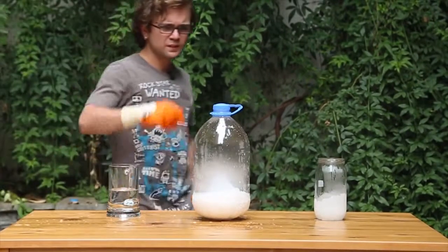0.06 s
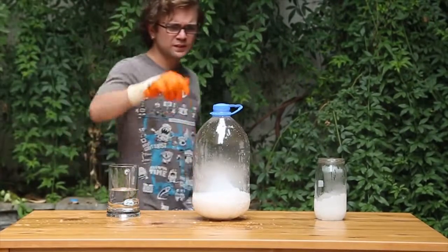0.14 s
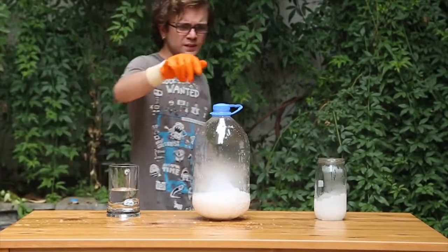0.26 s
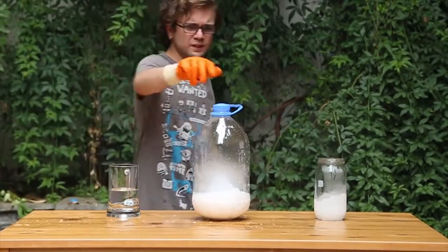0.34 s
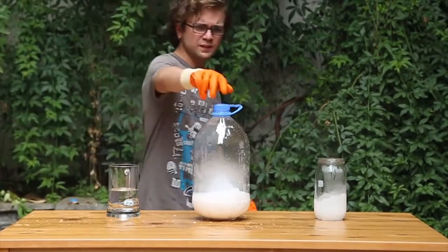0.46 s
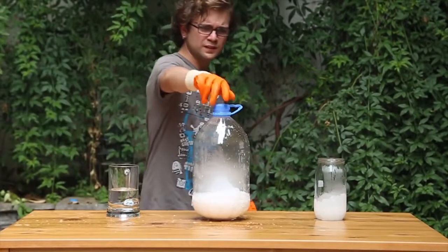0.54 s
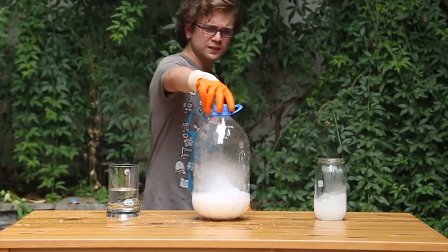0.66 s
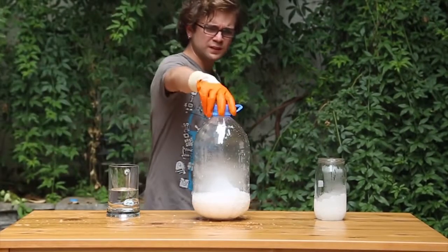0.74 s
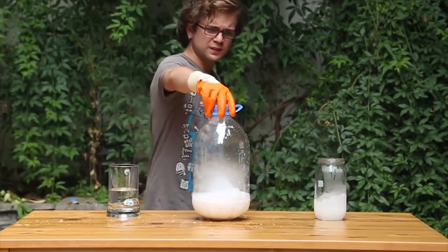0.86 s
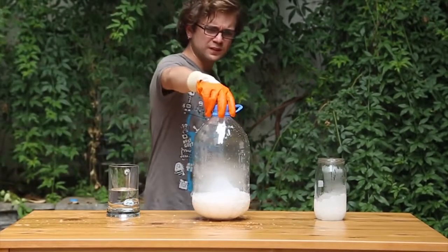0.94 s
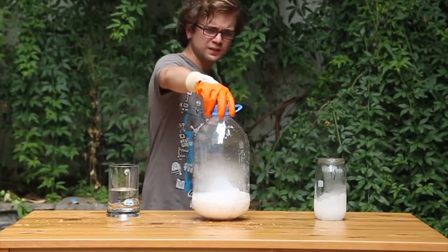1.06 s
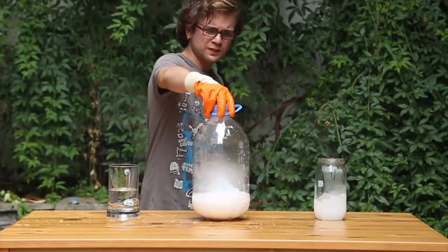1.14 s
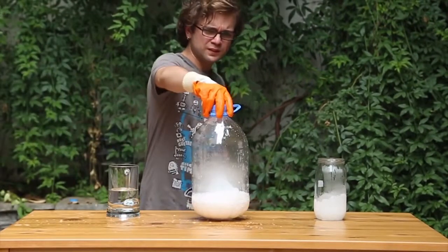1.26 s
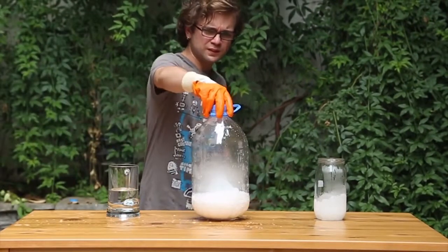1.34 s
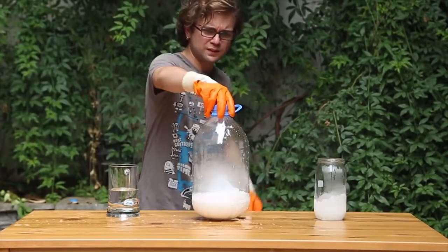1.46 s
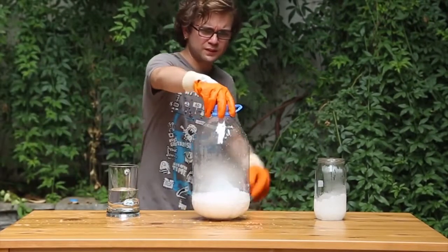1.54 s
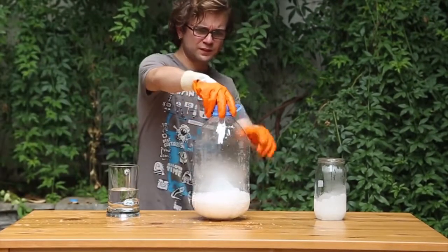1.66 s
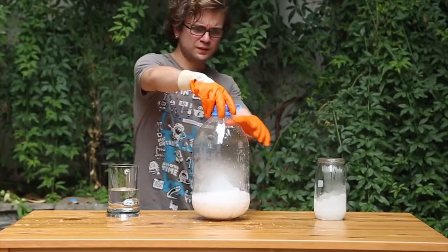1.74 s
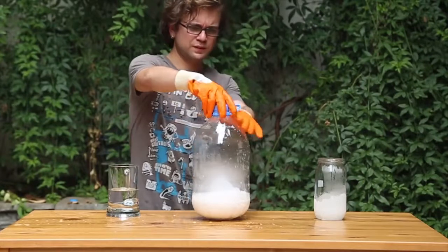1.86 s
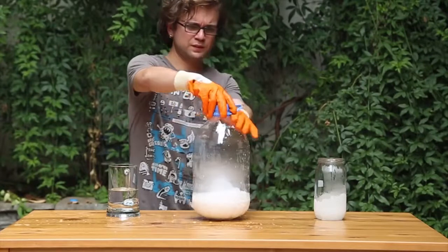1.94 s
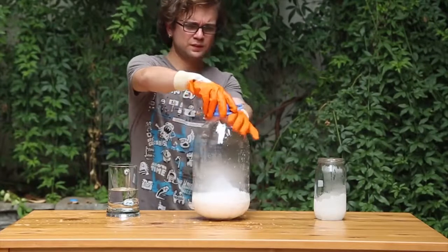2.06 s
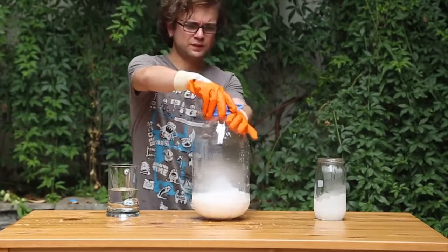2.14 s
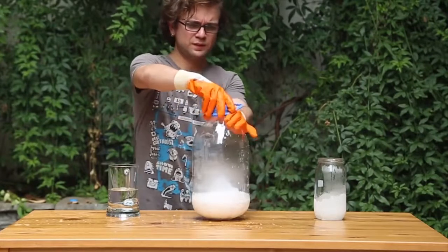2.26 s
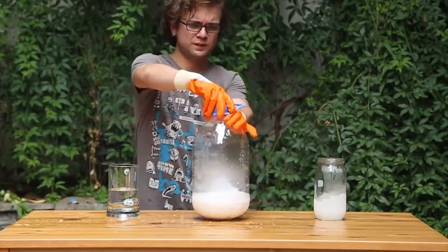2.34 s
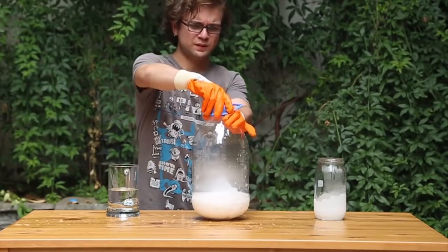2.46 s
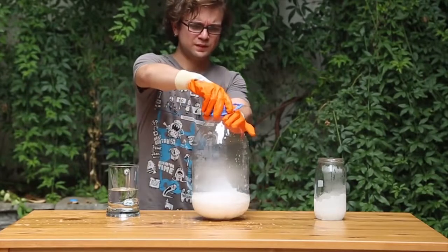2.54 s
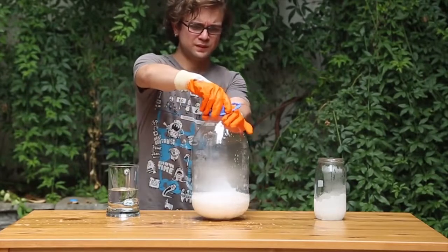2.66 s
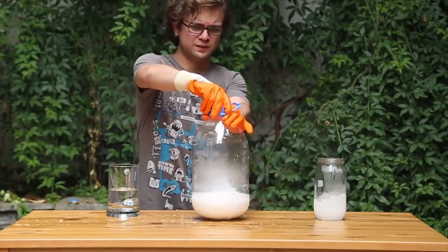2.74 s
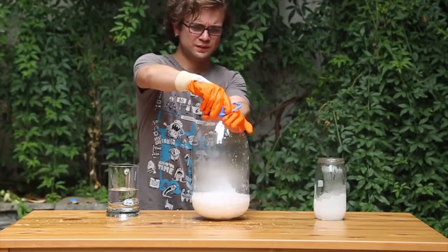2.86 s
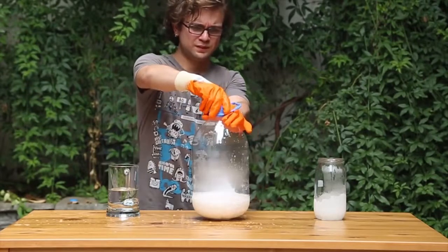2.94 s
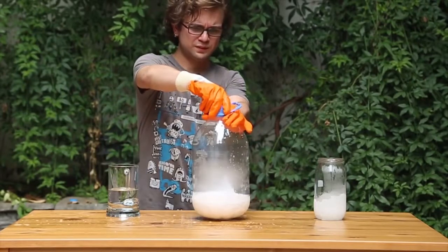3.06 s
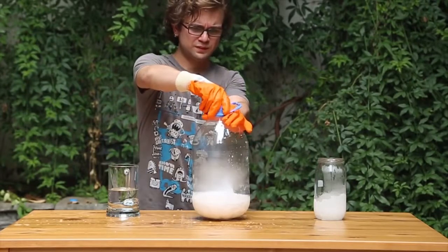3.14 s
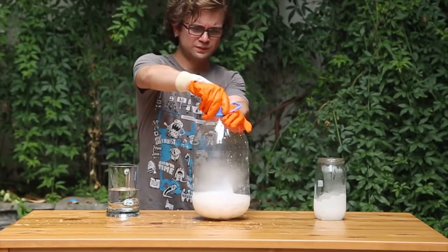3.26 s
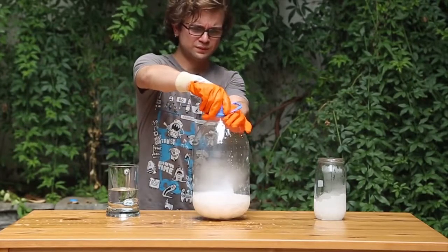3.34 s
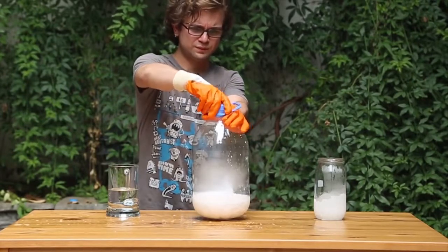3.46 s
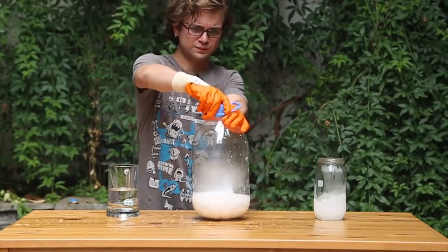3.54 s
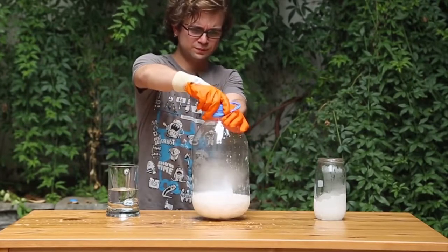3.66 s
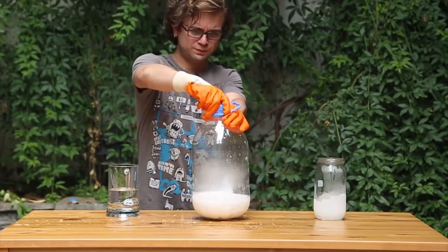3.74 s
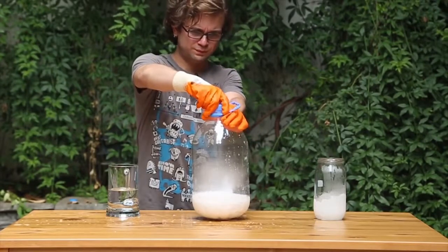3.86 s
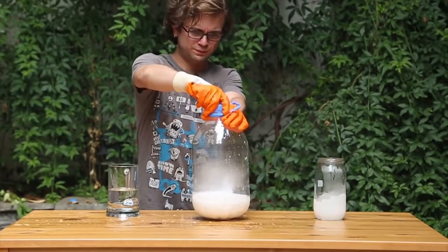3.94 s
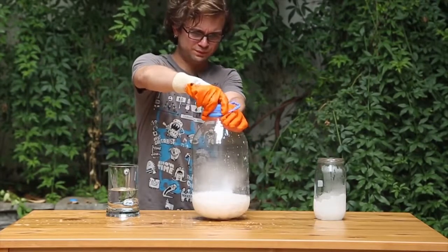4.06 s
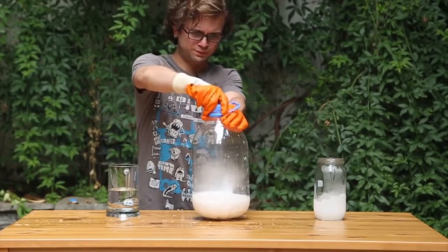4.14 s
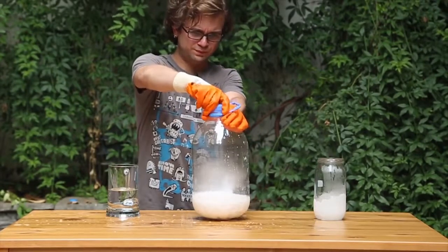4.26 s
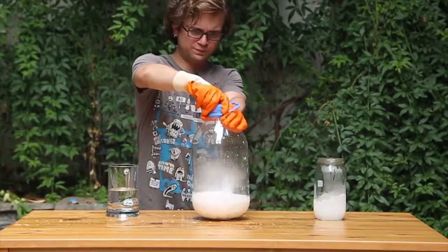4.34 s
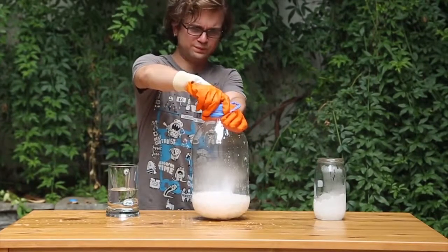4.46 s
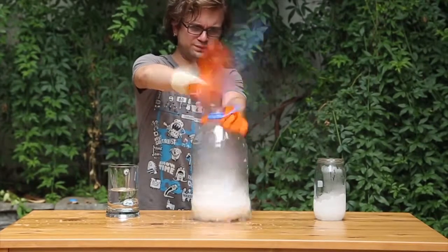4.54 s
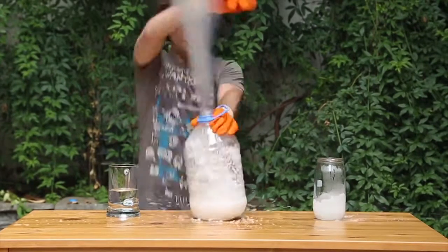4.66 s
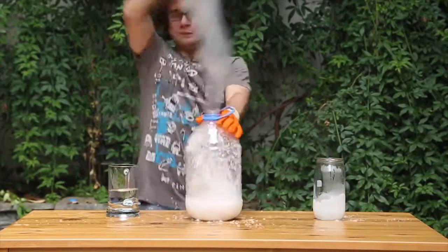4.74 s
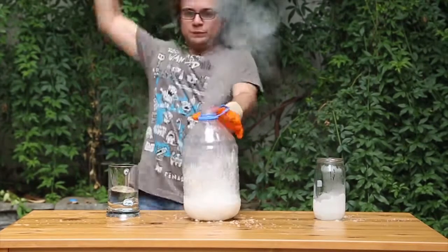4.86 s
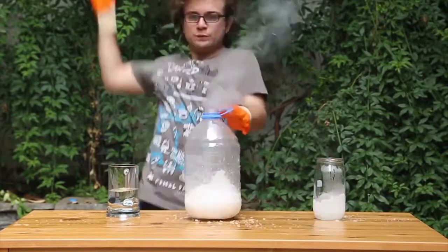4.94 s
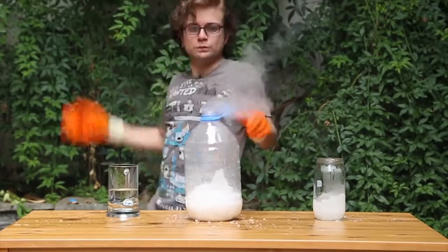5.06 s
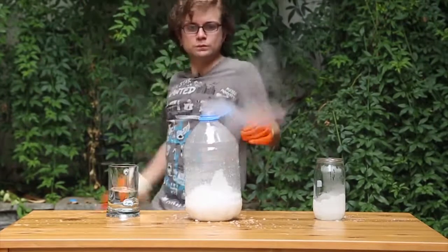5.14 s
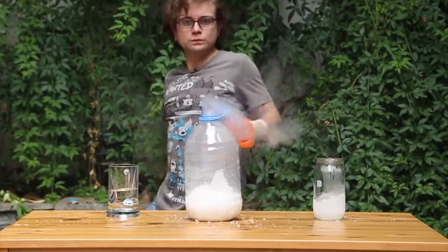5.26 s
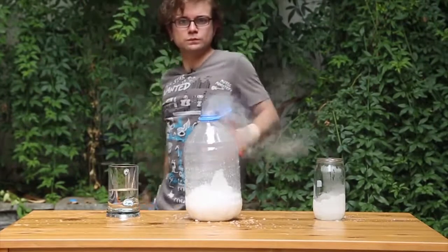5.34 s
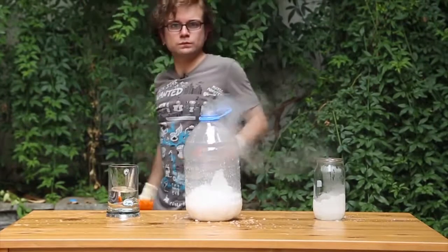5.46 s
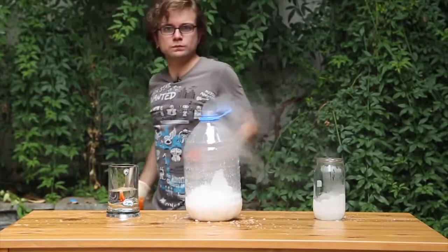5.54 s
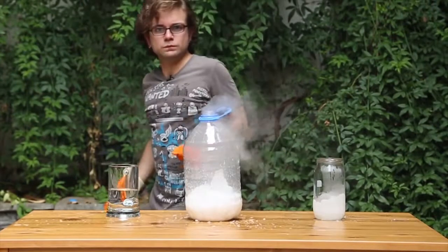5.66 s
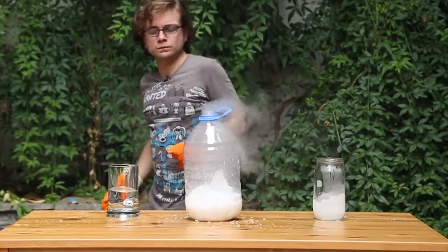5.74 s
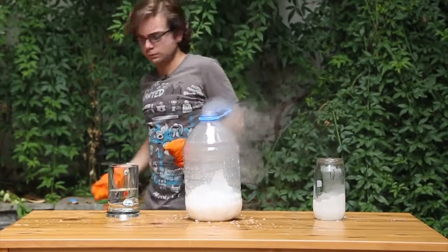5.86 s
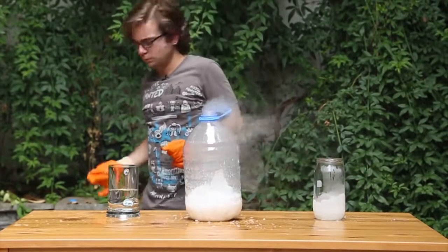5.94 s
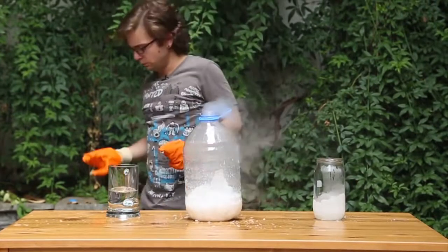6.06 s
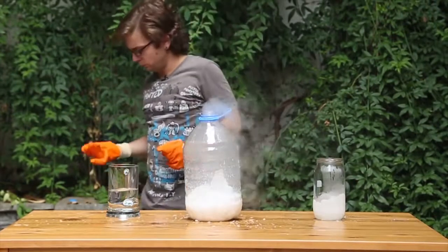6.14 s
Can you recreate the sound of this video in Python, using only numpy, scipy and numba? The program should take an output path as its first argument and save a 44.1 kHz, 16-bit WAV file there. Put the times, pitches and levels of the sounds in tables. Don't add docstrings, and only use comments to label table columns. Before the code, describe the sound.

Outdoors in a walled garden, over a faint town rumble, gas leaks past a plastic jug's cap with a high, wavering hiss. Fizz and gurgle grow inside, plastic ticks, gloves rub, sparrows chirp far off. A short jet rips out, the cap pops with a deafening, distorted bang, and echoes roll away in about a second. Ice crumbs patter and shoes scrape grit. One microphone a few metres off.

```python
import sys
import numpy as np
from scipy import signal
from scipy.io import wavfile
from scipy.ndimage import map_coordinates
from numba import njit

SR = 44100
rng = np.random.default_rng(int(sys.argv[2]) if len(sys.argv) > 2 else 0)


def master_out(mix):
    frames = np.transpose(np.atleast_2d(mix))
    ceiling = np.clip(frames, -1, 1)
    pcm = np.round(ceiling * 32767).astype(np.int16)
    wavfile.write(sys.argv[1], SR, pcm)


def level_to_linear(level):
    exponent = np.asarray(level, float) / 20
    return 10 ** exponent


N = 273678
POP_S = 4.6662


def rms_one(x):
    return x / np.sqrt(np.mean(x ** 2) + 1e-20)


def at_hz(points, hz):
    points = np.array(points)
    return np.interp(np.log(hz), np.log(points[:, 0]), points[:, 1])


def in_time(rows):
    s, *columns = np.transpose(rows)
    return [np.interp(np.arange(N) / SR, s, c) for c in columns]


def drift(rate):
    r = np.exp(-80 * np.pi * rate / SR)
    white = rng.standard_normal(N // 40 + 2002)
    slow = signal.lfilter([1], [1, -2 * r, r * r], white)[2000:]
    return np.interp(np.arange(N) / 40, np.arange(len(slow)), rms_one(slow))


@njit
def sweep(x, hz, width_hz, rate):
    out, r = np.zeros(len(x)), np.exp(-np.pi * width_hz / rate)
    for i in range(2, len(x)):
        drive = (1 - r * r) / 2 * (x[i] - x[i - 2])
        out[i] = drive + 2 * r * np.cos(2 * np.pi * hz[i] / rate) * out[i - 1] - r * r * out[i - 2]
    return out


def resonance(x, hz, width_hz):
    r = np.exp(-np.pi * width_hz / SR)
    poles = [1, -2 * r * np.cos(2 * np.pi * hz / SR), r * r]
    return signal.lfilter([(1 - r * r) / 2, 0, (r * r - 1) / 2], poles, x)


def bands(spectrum):
    edges = 22 * 2 ** np.arange(0, 9.9, .5)
    white = rng.standard_normal((2, N))
    hz = np.sqrt(edges[1:] * edges[:-1])
    rows = []
    for k in range(len(hz)):
        band = signal.butter(2, edges[k:k + 2], "band", fs=SR, output="sos")
        rows.append(signal.sosfilt(band, white[k % 2]))
    rows = np.array(rows) * level_to_linear(at_hz(spectrum, hz))[:, None]
    return hz, rows / np.std(rows.sum(axis=0))


def add(out, s, sound):
    i = round(s * SR)
    out[i:i + len(sound)] += sound[:N - i]


# [f/Hz, level/dB]
TOWN_COLOUR = [(15, -34), (25, -4), (64, -0.5), (253, -3.5), (323, -3.5), (497, -7), (650, -5),
               (1110, -14.5), (1210, -8.5), (1420, -11.5), (3840, -17.5), (9860, -30), (15600, -33.5)]
# [f/Hz, width/Hz, level/dB]
HUMS = [
    (57.5, 5, -67.5),
    (140, 8.8, -72),
]
TOWN_DB = -58.5


def town():
    hz, rows = bands(TOWN_COLOUR)
    out = level_to_linear(TOWN_DB + 1.5) * sum(row * level_to_linear(1.3 * drift(5)) for row in rows)
    for hum_hz, width, db in HUMS:
        once = resonance(rng.standard_normal(N), hum_hz, width)
        out = out + level_to_linear(db) * rms_one(resonance(once, hum_hz, width))
    return out


# [t/s, level/dB, gap opening/octaves that the jet's pitch sinks]
FLOW = [(0, -50.5, 0.2), (.7, -45.5, 0.067), (1.1, -45, 0.053), (1.5, -49, 0.5), (1.75, -46.5, 0.056),
        (2.1, -45, 0.27), (2.45, -47, 0.19), (2.85, -49, 0.44), (3.2, -42.5, 0.47), (3.5, -46, 0.59),
        (3.57, -42, 0.5), (3.68, -47.5, 0.8), (3.85, -40.5, 0.82), (4.35, -39, 0.87), (4.58, -46, 0.87),
        (4.62, -39.5, 0.86)]
# [f/Hz, width/Hz, level/dB, share of the flow's swing]
THREAD = [
    (7996, 1500, -0.5, 1),
    (11040, 4200, 0.5, 0.92),
    (14100, 3200, 0.0, 0.81),
]
# [f/Hz, width/Hz, level open/dB, gain while covered/dB]
PALM = (6101.5, 2235.5, -60, 8)
PALM_ON_S, PALM_OFF_S, PALM_MOVE_S = 0.76, 1.96, .06
TIGHT_JET_HZ, OFF_PITCH_DB_PER_OCT2, OFF_PITCH_FLOOR_DB = 15600, -31.5, -8


def thread_whistles():
    flow_db, opening = in_time(FLOW)
    t = np.arange(N) / SR
    covered = np.clip(np.minimum(t - PALM_ON_S, (PALM_OFF_S - t) / 3) / PALM_MOVE_S, 0, 1)
    levels = []
    for hz, _, db, follows in THREAD:
        off_pitch = np.log2(TIGHT_JET_HZ / hz) - opening
        off_pitch_db = np.maximum(OFF_PITCH_FLOOR_DB, OFF_PITCH_DB_PER_OCT2 * off_pitch ** 2)
        levels.append(-46 + db + follows * (flow_db + 46) + off_pitch_db)
    levels.append(PALM[2] + PALM[3] * covered)
    out = 0
    for (hz, width, *_), db in zip(THREAD + [PALM], levels):
        once = resonance(rng.standard_normal(N), hz, width)
        out = out + level_to_linear(db + 1.3 * drift(8.6)) * rms_one(resonance(once, hz, width))
    return out


# [t/s, dip f/Hz, spacing of neighbouring dips/Hz, depth 0-1]
HAND = [(0, 11460, 3480, 0.5), (.15, 10480, 3560, .75), (.4, 10860, 3300, .7), (.5, 12500, 2500, 0.01),
        (1.45, 13980, 2984, .2), (1.62, 12200, 3300, .7), (1.85, 9980, 2750, 0.8), (2.05, 8100, 2500, 0.7),
        (2.5, 8700, 1900, 0.8), (2.95, 8800, 3400, 1), (3.55, 9450, 3430, 0.7), (3.9, 10070, 3400, 0.7),
        (4.25, 10260, 3500, 1), (4.62, 10100, 3500, 0.8)]
CUP_SHUTS_AT, CUP_SHUTS_OVER = 0.42, 0.27
UPPER_DIP_SHARE, TREMBLE, DIP_FLICKER, CUP_LIFT = .85, .008, .2, 0.44
NECK_DIP_HZ, NECK_DIP_DEPTH = 9000, 0.59
CHEST_ECHO_MS = 1.2


def leak():
    out, opening = thread_whistles(), in_time(FLOW)[1]
    t = np.arange(N) / SR
    dip_hz, spacing_hz, depth = in_time(HAND)
    neck_depth = NECK_DIP_DEPTH * np.clip((PALM_OFF_S - t) / 0.66, 0, 1)
    dips = [(dip_hz - spacing_hz, (opening - CUP_SHUTS_AT) / CUP_SHUTS_OVER),
            (dip_hz, depth),
            (dip_hz + spacing_hz, UPPER_DIP_SHARE * depth),
            (NECK_DIP_HZ + 0 * t, neck_depth)]
    for hz, deep in dips:
        shaky_hz = hz * (1 + TREMBLE * drift(5))
        cut = np.clip(deep * (1 + DIP_FLICKER * drift(3)), 0, .9)
        out = out - cut * sweep(out, shaky_hz, 1150.0, SR)
    peak_hz = np.minimum(dip_hz + spacing_hz / 2, 15500)
    out = out + CUP_LIFT * depth * sweep(out, peak_hz, 1400.0, SR)
    lag = CHEST_ECHO_MS * (1 + .1 * drift(.6)) * SR / 1000
    for share, further in [(0.18, 1), (.2, 1.7)]:
        out = out + share * map_coordinates(out, [np.arange(N) - further * lag], order=3)
    return out * (t < POP_S)


def bubbles(per_s, clump_db, modes):
    sizes = level_to_linear(3 * np.minimum(rng.exponential(1, N), 3)) * rng.choice([-1, 1], N)
    grains = sizes * (rng.random(N) < per_s * level_to_linear(clump_db * drift(25)) / SR)
    out = 0
    for k, (hz, width, db) in enumerate(modes):
        out = out + level_to_linear(db) * resonance(grains, hz, width) * (-1) ** k
    return rms_one(out)


# [t/s, level/dB]
BOIL = [
    (0, -76.5),
    (.85, -80),
    (1.65, -71),
    (1.85, -67),
    (2.3, -66.5),
    (2.75, -64),
    (3.3, -61),
    (3.8, -61),
    (4.15, -62),
    (4.62, -65.5),
]
# [f/Hz, width/Hz, level/dB]
GURGLE = [
    (844, 210, 2.5),
    (1300, 260, 0.5),
]
# [f/Hz, width/Hz, level/dB]
FIZZ = [
    (1900, 130, 2),
    (2900, 550, 0.5),
    (3800, 2000, -3),
]
FIZZ_OVER_GURGLE_DB, FIZZ_FOLLOWS = 6, .9


def boil():
    vigour_db, = in_time(BOIL)
    fizz_db = -64 + FIZZ_OVER_GURGLE_DB + FIZZ_FOLLOWS * (vigour_db + 66)
    gurgle = level_to_linear(vigour_db + 4.0) * bubbles(2500, 2.4, GURGLE)
    fizz = level_to_linear(fizz_db - 0.5) * bubbles(6000, 2.0, FIZZ)
    return (gurgle + fizz) * (np.arange(N) < POP_S * SR)


# [t/s, peak level/dB, f/Hz, brightness/dB]
TICKS = [(0.23, -37, 1140, -9), (1.03, -39.5, 3700, -19), (1.128, -34, 5060, -12), (1.242, -29, 1630, -5.5),
         (1.269, -16, 1430, -15), (1.288, -29.5, 660, -19), (1.317, -33.5, 770, -20),
         (1.422, -32, 4500, -3), (1.636, -20.5, 1310, -14.5), (1.667, -33.5, 711, -13),
         (2.02, -40, 320, -20), (2.43, -32.5, 2700, -5), (2.58, -34.5, 1300, -0.5), (3.016, -39, 960, -18),
         (3.197, -32.5, 2660, 0.5), (3.439, -35, 5030, -14), (3.917, -36.5, 899, -4),
         (4.223, -36.5, 800, -7), (4.27, -37.5, 720, -6), (4.562, -38, 2960, -13), (5.195, -28, 3900, -19),
         (5.519, -40, 884, -22), (5.568, -42.5, 1080, -28.5), (5.795, -52, 3510, -20),
         (5.932, -47, 3900, -18)]
SNAP_T60_S, SNAP_EDGE = .02, 5.0
TICK_RING, WALL_HZ, WALL_DB = 0.42, 724, -13.5


def ticks():
    out, t = np.zeros(N), np.arange(800) / SR
    for s, db, hz, bright_db in TICKS:
        crack = rng.standard_normal(800) * level_to_linear(-60 * t / SNAP_T60_S) + SNAP_EDGE * (t == t[30])
        mode = TICK_RING * np.sin(2 * np.pi * hz * t) + level_to_linear(WALL_DB) * np.sin(2 * np.pi * WALL_HZ * t)
        mode = mode * level_to_linear(-60 * t / 0.024)
        wide = rms_one(resonance(crack, 1340, 1600) - 1.1 * resonance(crack, 3900, 3200))
        wide = wide * level_to_linear(-11 - 60 * t / 0.04)
        top = rms_one(resonance(crack, 5000, 7900)) * level_to_linear(bright_db - 5.0 - 60 * t / 0.02)
        onset = np.minimum(t / 0.00057, 1)
        add(out, s - .0008, level_to_linear(db - 2.5) * (mode + wide + top) * onset)
    return out


TABLE_DIP_HZ = 2170


def table(x):
    return x - 0.68 * resonance(x, TABLE_DIP_HZ, 1000)


def glides(notes, blur):
    out = np.zeros(N)
    for s, length, start_hz, end_hz, db in notes:
        n = round(length * SR)
        phase = 2 * np.pi * np.cumsum(np.linspace(start_hz, end_hz, n)) / SR
        add(out, s, level_to_linear(db) * np.sin(phase) * np.hanning(n) ** .5)
    return out * (1 + blur)


def yard(x):
    t = np.arange(round(.5 * SR)) / SR
    tail = rng.standard_normal(len(t)) * level_to_linear(-39 - 60 * t / .4) * (t > .012)
    return x + signal.fftconvolve(x, tail)[:N]


# [t/s, length/s, start f/Hz, end f/Hz, level/dB]
CHIRPS = [(.375, 0.024, 3950, 3930, -58), (.39, 0.025, 2900, 2750, -67), (.42, 0.067, 10000, 14400, -50.5),
          (.79, 0.06, 7000, 3700, -63), (.84, 0.027, 3770, 3570, -56), (.862, 0.03, 3050, 2760, -62),
          (1.33, 0.036, 2820, 2830, -60), (1.775, 0.063, 4410, 4150, -55),
          (1.795, 0.0354, 3900, 2900, -57.5), (1.85, 0.069, 2900, 2770, -64), (2.34, 0.11, 4250, 3900, -58),
          (2.41, 0.027, 4000, 3580, -54.5), (2.78, 0.047, 4300, 4100, -60), (3.155, 0.04, 4200, 3600, -58)]


def sparrows():
    notes = glides(CHIRPS, 2.2 * drift(300))
    return yard(notes + .5 * np.roll(notes, 700))


# [t/s, length/s, start f/Hz, end f/Hz, level/dB]
HOOTS = [
    (.85, .38, 525, 515, -62),
    (2.05, .25, 290, 318, -63),
    (2.3, .2, 318, 362, -61),
    (2.5, .2, 350, 372, -63),
]


def hoots():
    return glides(HOOTS, .4 * drift(5.2))


def stroke(length):
    n = round(length * SR)
    grit = rng.standard_normal(n) * level_to_linear(2.5 * rng.exponential(1, n))
    return grit, np.sin(np.linspace(0, np.pi, n)) ** .8


# [t/s, length/s, level/dB, start f/Hz, end
# f/Hz]
SCUFFS = [(.895, 0.091, -53.5, 745, 1530), (1.284, .12, -52, 3900, 3800), (2.124, 0.065, -48, 1150, 1500),
          (2.13, 0.057, -49.5, 1900, 2900), (3.05, 0.051, -46, 10400, 10300), (1.791, .19, -54, 4000, 3600),
          (2.541, 0.062, -57, 1200, 1250), (2.99, .13, -56.5, 1000, 950), (3.27, .1, -58.5, 1150, 950),
          (3.536, .1, -50.5, 880, 880), (3.538, 0.1, -44.5, 11000, 11100)]
SCUFF_WIDTH = 0.79


def scuffs():
    out = np.zeros(N)
    for s, length, db, start_hz, end_hz in SCUFFS:
        grit, shape = stroke(length)
        hz, width = np.linspace(start_hz, end_hz, len(grit)), SCUFF_WIDTH * start_hz
        rub = sweep(sweep(grit, hz, width, SR), hz, width, SR)
        add(out, s, level_to_linear(db) * rms_one(rub) * shape)
    return out


# [t/s, level/dB]
JET = [
    (4.62, -49.5),
    (4.634, -19),
    (4.664, -16.5),
    (4.672, -26),
    (4.69, -12.5),
    (4.75, -10.5),
    (4.81, -14),
    (4.95, -33),
    (5.1, -53.5),
]
# [f/Hz, level per Hz/dB]
JET_COLOUR = [(35, -41), (60, -19), (313, 2.5), (547, -7), (1290, -9.5), (2110, -9.5), (2850, -8),
              (4240, -9), (15600, -11.5)]
SLIT_CUT_HZ, SLIT_CUT_DB = 330, -1.5


def jet():
    hz, rows = bands(JET_COLOUR)
    t = np.arange(N) / SR
    dulling_db = -25 * np.outer((hz / 15000) ** 4, np.maximum(t - 4.68, 0)) / 0.32
    slit_db = SLIT_CUT_DB * np.outer(hz < SLIT_CUT_HZ, t < POP_S)
    roar = (rows * level_to_linear(dulling_db + slit_db)).sum(axis=0)
    level = level_to_linear(in_time(JET)[0] + 0.39 * drift(69))
    return roar * level * (t > JET[0][0]) * (t < JET[-1][0])


# [delay t/s, level/dB]
SLAPS = [
    (0.0148, -13),
    (0.0191, -0.5),
    (0.0219, -10),
    (0.0302, -6.5),
    (.048, -3),
    (.0535, -9),
    (0.0651, -4.5),
    (.078, -10),
]
# [t/s, f/Hz, level/dB, t60/s]
BOOM = (4.686, 105, -8, .14)
POP_LENGTH_S, POP_DB = .0018, 4


def pop():
    out, t = np.zeros(N), np.arange(9000) / SR
    n = POP_LENGTH_S * SR
    fall = np.linspace(.9, -1.3, round(n * .35))
    refill = np.linspace(-1.3, .1, round(n * .55))
    pulse = level_to_linear(POP_DB) * np.r_[fall, refill]
    for delay, db in [(0, 0)] + SLAPS:
        add(out, POP_S + delay, level_to_linear(db) * pulse)
    band = signal.butter(1, [90, 5500], "band", fs=SR, output="sos")
    out = signal.sosfilt(band, out + 1e-18)
    s, hz, db, t60 = BOOM
    add(out, s, level_to_linear(db - 60 * t / t60) * np.sin(2 * np.pi * hz * t) * np.minimum(t / 0.0059, 1))
    return out


# [t/s, level/dB]
ROLL = [
    (4.666, -48.5),
    (4.668, -9),
    (4.679, -11),
    (4.684, -6),
    (4.7, -12.5),
    (4.71, -11.5),
    (4.74, -13.5),
]
# [f/Hz, level per Hz/dB]
ROLL_COLOUR = [(18, -32), (30, -9.5), (126, -8), (565, -9.5), (848, -8), (1050, -4.5), (1690, -9),
               (1910, -13), (2600, -14), (4000, -15.5), (9000, -25), (11700, -39.5), (19800, -120)]
# [f/Hz, t60/s]
YARD_T60 = [(40, 0.94), (90, 1.2), (160, 0.94), (300, 1.24), (1000, 0.95), (2300, 1.03), (3500, 0.92),
            (6000, 0.91), (10000, 0.63)]


def roll():
    hz, rows = bands(ROLL_COLOUR)
    t = np.arange(N) / SR
    since, lumps = np.maximum(t - ROLL[-1][0], 0), drift(27)
    out = 0
    for f, row in zip(hz, rows):
        decay_db = -60 * since / at_hz(YARD_T60, f)
        out = out + row * level_to_linear(decay_db + 0.38 * lumps + 0.34 * drift(27))
    return out * level_to_linear(in_time(ROLL)[0]) * (t > ROLL[0][0])


# [t/s, level/dB]
CRUMBS = [
    (5.188, -39),
    (5.384, -31),
    (5.417, -51),
]
PATTER_S, PATTER_PER_S, PATTER_DB, PATTER_T60_S = 4.95, 900, -53.5, 1.1


def crumbs():
    since = np.arange(N) / SR - PATTER_S
    size_db = 4 * np.minimum(rng.exponential(1, N), 3)
    landed = (rng.random(N) < PATTER_PER_S / SR) * (since > 0)
    hits = landed * level_to_linear(PATTER_DB - 60 * since / PATTER_T60_S + size_db)
    for s, db in CRUMBS:
        hits[round(s * SR)] = level_to_linear(db)
    ring = signal.lfilter([1], [1, -level_to_linear(-60 / (.012 * SR))], hits + 1e-18)
    band = signal.butter(3, [5300, 13500], "band", fs=SR, output="sos")
    return signal.sosfilt(band, ring * rng.standard_normal(N))


# [t/s, length/s, level/dB, grit level/dB]
STEPS = [
    (5.515, .03, -49, -7),
    (5.536, .055, -53, -6.5),
    (5.552, 0.035, -50, -14.5),
    (5.584, 0.12, -59.5, -5.5),
    (5.804, .086, -58, -10),
    (5.925, .17, -55.5, -11),
    (5.94, 0.079, -47, -10),
]
# [f/Hz, width/Hz, level/dB]
SOLE = [
    (260, 200, -1.5),
    (1000, 770, 6),
]


def steps():
    out = np.zeros(N)
    for s, length, db, grit_db in STEPS:
        grit, shape = stroke(length)
        sole = rms_one(sum(level_to_linear(g) * resonance(resonance(grit, hz, w), hz, w) for hz, w, g in SOLE))
        bright = rms_one(resonance(grit, 4700, 3000) - .3 * resonance(grit, 11000, 9000))
        add(out, s, level_to_linear(db) * (sole + level_to_linear(grit_db) * bright) * shape)
    return out


def scene():
    jug = table(leak() + boil() + ticks())
    handling = scuffs() + hoots()
    blast = jet() + pop() + roll()
    return (town() + jug + sparrows() + handling + blast + crumbs() + steps())[None]


def band_limit(x):
    return signal.sosfilt(signal.butter(12, 15740, fs=SR, output="sos"), x)


MIC_HISS_DB = -75.5
DUCK_DB, DUCK_RECOVER_S = -0.5, 2.7


def record(dry):
    bass_cut = signal.butter(2, 42, "high", fs=SR, output="sos")
    x = signal.sosfilt(bass_cut, dry) + level_to_linear(MIC_HISS_DB) * rng.standard_normal(dry.shape)
    since = np.arange(N) / SR - POP_S - .3
    recovery = np.exp(-np.maximum(since, 0) / DUCK_RECOVER_S)
    x = x * level_to_linear(DUCK_DB * np.clip(since / 0.22, 0, 1) * recovery)
    x = np.clip(1.6 * np.tanh(x / 1.6), -1, 1)
    return band_limit(x)


dry = scene()
out = record(dry)
master_out(out)
```